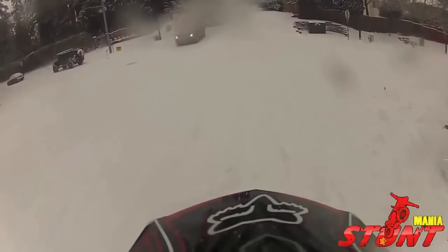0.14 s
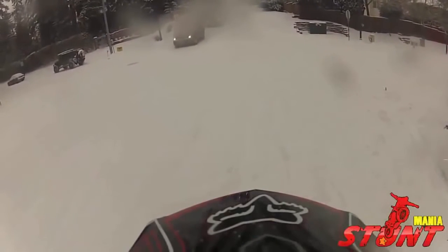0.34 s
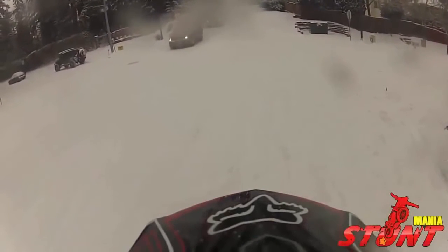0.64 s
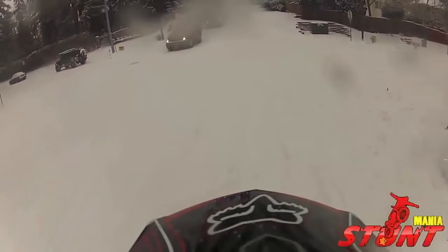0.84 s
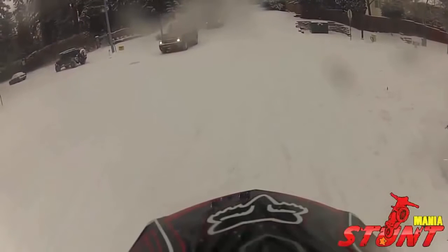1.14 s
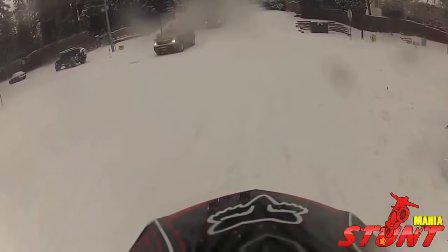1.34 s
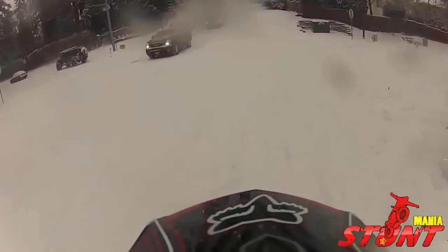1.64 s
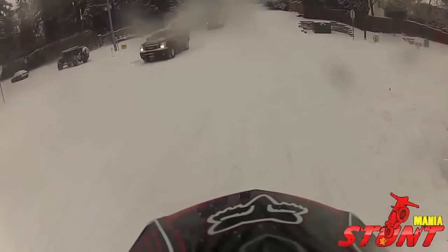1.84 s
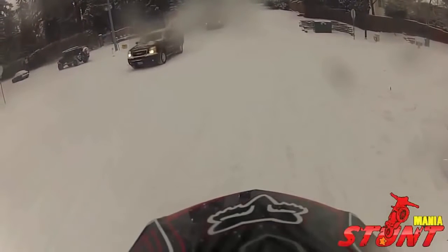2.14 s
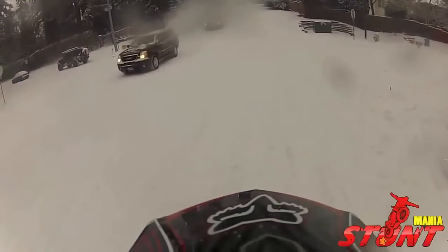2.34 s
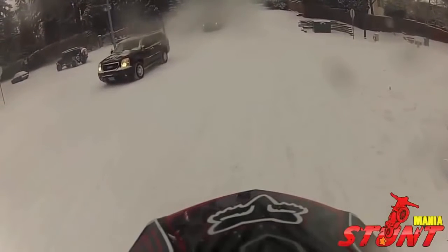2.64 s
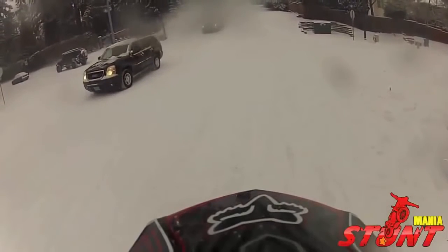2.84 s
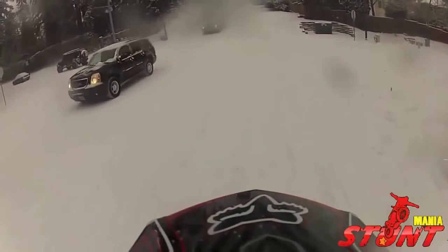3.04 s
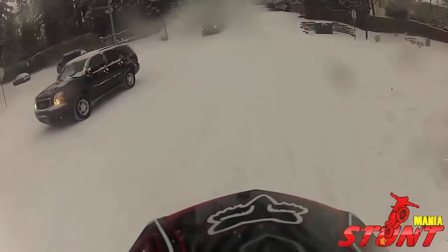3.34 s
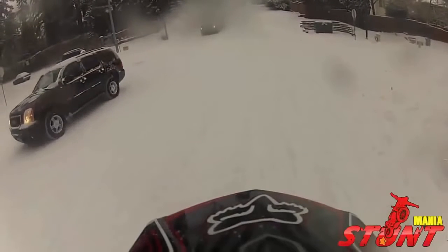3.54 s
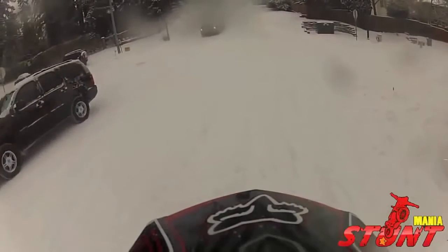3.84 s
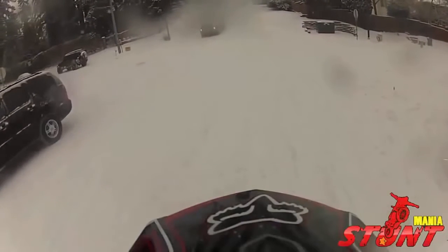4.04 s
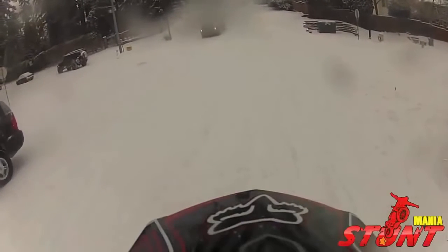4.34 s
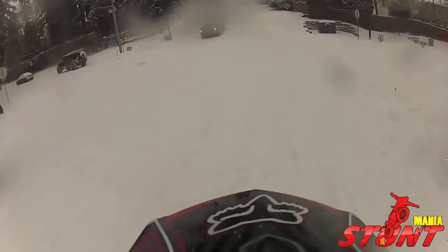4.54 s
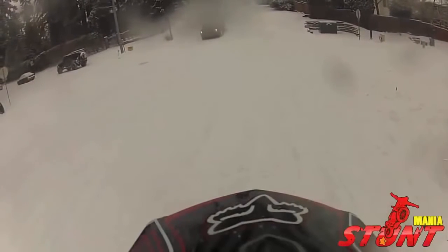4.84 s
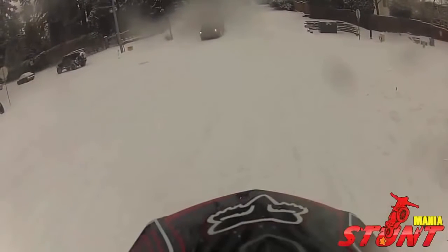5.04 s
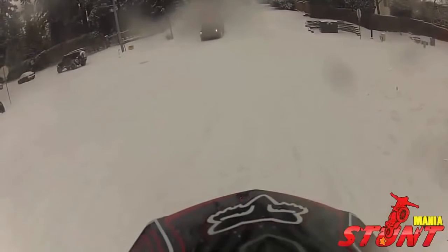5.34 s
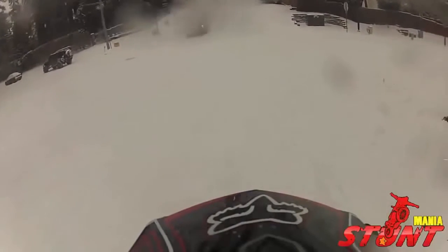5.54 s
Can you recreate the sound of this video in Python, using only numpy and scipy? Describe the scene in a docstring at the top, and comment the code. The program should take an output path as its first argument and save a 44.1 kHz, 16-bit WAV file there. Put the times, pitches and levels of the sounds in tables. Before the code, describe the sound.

A single-cylinder two-stroke quad bike rolls along a snowy street on a light throttle, heard close up from the rider's seat. The engine is already running at the start, a fast, uneven putter with a hollow ring from the exhaust pipe. It is fairly quiet at first, then at about 1.3 seconds the volume steps up sharply and stays there until the end, near 5.7 seconds. The pitch holds almost steady throughout, with only slight wavering. Brief misfires and harder pops break up the rhythm several times a second, with a dense run of pops from about 2.8 to 3.5 seconds. The hardest pops distort slightly and carry a thin, crackling sizzle. Puffs of exhaust gas and a light mechanical clatter follow the firing, while a soft, low rumble of tyres and air continues underneath.

```python
"""Quad bike on a snowy street.

A single-cylinder two-stroke rolls along on a light throttle, heard from the rider's seat.
It turns about 61 times a second and fires unevenly: some strokes miss, others bang. Each rings the
exhaust pipe, with a rush of gas and a clatter, over the rumble of tyres and air. The camera overloads
on the bangs and holds each of its samples, which adds a thin sizzle; the volume steps up once."""
import sys
import numpy as np
from scipy import signal
from scipy.fft import rfft, irfft
from scipy.io import wavfile

SR = 44100
rng = np.random.default_rng(int(sys.argv[2]) if len(sys.argv) > 2 else 0)


def bounce(signal):
    """Save signal as a 16-bit WAV file at the path given by the first command-line argument."""
    frames = np.transpose(np.atleast_2d(signal))
    limited = np.clip(frames, -1, 1)
    pcm = np.round(limited * 32767).astype(np.int16)
    wavfile.write(sys.argv[1], SR, pcm)


N = 250929
TIME_S = np.arange(N) / SR
BINS_HZ = np.fft.rfftfreq(N, 1 / SR)

# Crank speed. Each row: time in seconds, turns per second.
CRANK_SPEED = [(0, 60.7), (.31, 62.7), (.82, 58.8), (1.01, 60.6), (1.74, 61.4), (1.8, 62.3), (1.91, 62.6),
               (2.42, 60.85), (2.82, 58.3), (2.88, 60.1), (3.48, 61.3), (3.79, 61.8), (3.84, 60.1),
               (4.55, 59.15), (4.74, 60.3), (4.78, 61), (5.4, 62.6), (5.69, 60.6)]
# The hardest bangs. Each row: time in seconds, relative force.
HARD_BANGS = [(0.12, 0.59), (.281, 0.59), (0.331, 0.51), (.41, 0.56), (0.54, 0.56), (0.74, 0.52),
              (1.01, 0.52), (1.058, 0.51), (1.305, 0.45), (1.419, 0.6), (1.469, 0.49), (1.55, 0.45),
              (1.73, 0.48), (1.762, 0.46), (1.843, 0.61), (1.922, 0.45), (2.003, 0.59), (2.197, 0.56),
              (2.36, 0.57), (2.49, 0.46), (2.828, 0.53), (2.962, 0.5), (2.995, 0.47), (3.028, 0.46),
              (3.077, 0.48), (3.144, 0.44), (3.194, .6), (3.26, 0.5), (3.308, 0.48), (3.357, 0.5),
              (3.407, .54), (3.455, 0.48), (3.684, .54), (3.702, 0.52), (3.913, 0.52), (4.094, 0.55),
              (4.18, 0.45), (4.214, 0.51), (4.315, 0.46), (4.433, 0.48), (4.551, 0.51), (4.785, .58),
              (4.898, 0.49), (4.947, 0.52), (5.028, 0.53), (5.11, 0.54), (5.305, .54), (5.528, 0.55),
              (5.611, .54)]
# The engine fails to fire. Each row: start in seconds, length in seconds.
MISFIRES = [(.03, .017), (.21, .033), (.338, .033), (.598, .017), (1.067, .033), (1.215, .033),
            (1.51, .033), (1.787, .017), (1.931, .033), (2.09, .05), (2.27, .033), (2.434, .033),
            (3.317, .033), (3.529, .033), (3.627, .017), (4.022, .033), (4.842, .017), (5.07, .033),
            (5.343, .033), (5.634, .017)]


def engine_strokes(usual=0.33, scatter=0.11, missed=0.092, missed_spread_db=4.5, lean_limit=-1.0,
                   starve=0.3, lag_turns=4, jitter_s=0.00029, kick_s=0.0018,
                   before_bang=0.67, after_bang=0.89):
    """Time and force of each stroke, one a turn. A strong one starves a later one: the engine surges."""
    turns = np.cumsum(np.interp(TIME_S, *np.transpose(CRANK_SPEED))) / SR
    times_s = 0.006 + np.interp(np.arange(int(turns[-1])), turns, TIME_S)
    bangs = {np.argmin(abs(times_s - at_s)): (at_s, force) for at_s, force in HARD_BANGS}
    forces = np.full(len(times_s), usual)
    for k, (delay, fuel, leak) in enumerate(rng.standard_normal((len(times_s), 3))):
        charge = fuel - starve * (forces[k - lag_turns] - usual) / scatter
        surge = np.sum(forces[max(k - lag_turns, 0):k] - usual)
        times_s[k] += jitter_s * delay - kick_s * surge  # extra force brings the next stroke sooner
        misfire = any(0 <= times_s[k] - start_s < length_s for start_s, length_s in MISFIRES)
        if k in bangs:
            times_s[k], forces[k] = bangs[k]
        elif charge < lean_limit or misfire:
            forces[k] = missed * from_db(missed_spread_db * leak)
        else:
            share = before_bang if k + 1 in bangs else after_bang if k - 1 in bangs else 1
            forces[k] = share * (usual + scatter * np.tanh(charge))
    return np.c_[times_s, forces]


# Exhaust pipe modes. Each row: frequency in Hz, width in Hz, relative level in dB.
PIPE_MODES = [(53.7, 13, -28), (126.5, 22.2, -22.5), (172.2, 9.4, -26.5), (243.8, 29.8, -5.5),
              (313, 48.3, -4), (346.2, 10.8, -14), (457.4, 3.3, -26), (546.5, 120, -5.5), (627, 51.5, -7),
              (716.8, 34, 0)]


def exhaust_ring(strokes, gain_db=3.0, full_force=0.52, detune=0.019, sag=0.097, uneven_db=1.2,
                 build_s=0.0063, muffler_hz=640):
    """Each stroke builds standing waves in the pipe. The gas varies; a large charge rings lower."""
    mode_hz, width_hz, level_db = np.transpose(PIPE_MODES)[:, :, None]
    t = np.arange(SR // 12) / SR
    build_up = 1 - 0.2 * np.exp(-t / build_s)
    envelopes = from_db(level_db) * np.exp(-np.pi * width_hz * t) * build_up
    rings = np.zeros(N)
    for start_s, force in strokes:
        pitch_draw, level_draw = rng.standard_normal((2, len(PIPE_MODES), 1))
        drive = full_force * np.tanh(force / full_force)
        tuning = 1 + detune * pitch_draw - sag * (drive - full_force / 2)
        modes = from_db(uneven_db * level_draw) * envelopes * np.cos(2 * np.pi * mode_hz * tuning * t)
        add(rings, start_s, drive * modes.sum(0))
    return from_db(gain_db) * low_pass(rings, muffler_hz, slope=21.1)


def pressure_fronts(strokes, gain_db=1, centre_hz=470, from_force=0.42):
    """The extra force of a bang leaves the pipe as one sharp pressure front."""
    t = np.arange(-SR // 200, SR // 200) / SR
    bend = (np.pi * centre_hz * t) ** 2
    pulse = (1 - 2 * bend) * np.exp(-bend)
    fronts = np.zeros(N)
    for peak_s, force in strokes:
        add(fronts, peak_s + t[0], max(force - from_force, 0) * pulse)
    return from_db(gain_db) * fronts


# Thump and crack of a bang. Each row: frequency in Hz, relative density in dB.
SHOCK_SPECTRUM = [(20, 1.5), (50, 19), (150, 2.5), (600, -9), (950, 12), (1400, -25.5), (2200, -6.5),
                  (3500, -35.5), (5000, -32.5), (7500, -14.5), (9500, -11), (14000, -54)]


def shock_cracks(strokes, rms_db=-47, lead_s=0.00068, from_force=0.33):
    """A hard stroke steepens into a shock on its rising flank: pressure jumps from low to high."""
    clicks = np.zeros(N)
    for peak_s, force in strokes:
        add(clicks, peak_s - lead_s, np.array([max(force - from_force, 0)]))
    jumps = signal.hilbert(clicks).imag
    return from_db(rms_db) * colour(jumps, SHOCK_SPECTRUM)


# Escaping gas. Each row: frequency in Hz, relative density in dB.
GAS_SPECTRUM = [(80, -9), (200, -43.5), (350, -34.5), (500, 6), (680, 5.5), (820, -4), (1200, -18.5),
                (2000, -37), (4000, -45)]


def gas_rush(strokes, rms_db=-32):
    """Gas rushes out after each stroke."""
    return from_db(rms_db) * noise(GAS_SPECTRUM, puffs(strokes, decay_s=0.0053))


# Piston, fins and chain. Each row: frequency in Hz, relative density in dB.
CLATTER_SPECTRUM = [(500, 3), (1000, 1.5), (1500, 8), (2100, -1), (2550, 2), (2790, 7), (2960, -1.5),
                    (3130, 8), (3400, -2), (4400, -6), (5500, -15), (7000, -39.5)]


def engine_clatter(strokes, rms_db=-51):
    """The cylinder is heard directly, a moment before its pulse has run through the pipe."""
    return from_db(rms_db) * noise(CLATTER_SPECTRUM, puffs(strokes, decay_s=0.0055, lead_s=0.0068))


# Tyres and air. Each row: frequency in Hz, relative density in dB.
RUMBLE_SPECTRUM = [(10, 4.5), (30, 4), (70, 17), (150, 14.5), (400, -33.5), (1000, -35.5), (3000, -75)]


def rolling_rumble(rms_db=-42):
    """Tyres on snow and air on the camera make a steady rumble."""
    return from_db(rms_db) * noise(RUMBLE_SPECTRUM)


def puffs(strokes, decay_s, lead_s=0, floor=0.13):
    """An envelope that jumps lead_s before each stroke and decays to a floor."""
    kicks = np.zeros(N)
    for start_s, force in strokes:
        add(kicks, start_s - lead_s, np.array([force]))
    return floor + signal.lfilter([1], [1, -np.exp(-1 / (decay_s * SR))], kicks)


def noise(spectrum, envelope=1):
    """Noise of rms 1, shaped in time, then coloured."""
    return colour(envelope * rng.standard_normal(N), spectrum)


def colour(x, spectrum):
    """Filters by the spectrum and scales to rms 1."""
    hz, db = np.transpose(spectrum)
    gain = from_db(np.interp(np.log(BINS_HZ + 1), np.log(hz), db))
    coloured = irfft(rfft(x) * gain, N)
    return coloured / coloured.std()


def low_pass(x, cutoff_hz, slope):
    """Zero-phase low-pass; slope is the power of the fall."""
    return irfft(rfft(x) / (1 + (BINS_HZ / cutoff_hz) ** slope), N)


def add(mix, start_s, sound):
    """Mixes a sound in, dropping what falls outside."""
    at = round(start_s * SR) + np.arange(len(sound))
    inside = (at >= 0) & (at < N)
    mix[at[inside]] += sound[inside]


def from_db(db):
    """Decibels to gain."""
    return 10 ** (np.asarray(db) / 20)


def scene():
    """Exhaust, gas and clatter follow the same strokes, over the rumble of rolling."""
    strokes = engine_strokes()
    noises = gas_rush(strokes) + engine_clatter(strokes) + rolling_rumble()
    exhaust = exhaust_ring(strokes) + pressure_fronts(strokes) + shock_cracks(strokes)
    return (exhaust + noises)[None]


# Overall level; it steps up once. Each row: time in seconds, gain in dB.
LEVEL_STEPS = [(0, -11.5), (1.244, -12), (1.272, -0.5), (5.69, -0.5)]


def record(dry, ceiling=0.48, knee=26.4, peak_leak=0.017, band_hz=7500,
           hold_hz=12000, sizzle_db=2.0, edge_hz=15600):
    """The camera overloads, held samples mirror the sound around hold_hz, and the volume steps up."""
    pressure = dry[0]
    squashed = pressure / (1 + abs(pressure / ceiling) ** knee) ** (1 / knee)
    overloaded = low_pass(squashed + peak_leak * (pressure - squashed), band_hz, slope=4.2)
    # the steps of a held signal are as tall as its slope
    sizzle = from_db(sizzle_db) * np.gradient(overloaded) * np.cos(2 * np.pi * hold_hz * TIME_S)
    volume = from_db(np.interp(TIME_S, *np.transpose(LEVEL_STEPS)))
    band_limit = signal.firwin(511, edge_hz, window=("kaiser", 9), fs=SR)
    return signal.oaconvolve(volume * (overloaded + sizzle), band_limit, "same")[None]


dry = scene()
out = record(dry)
bounce(out)
```